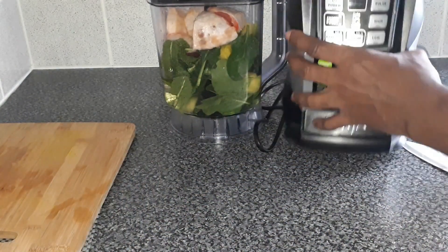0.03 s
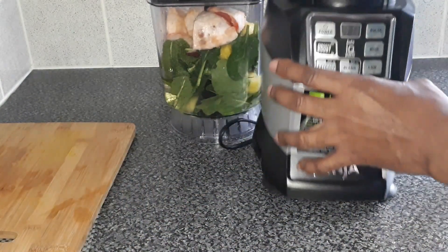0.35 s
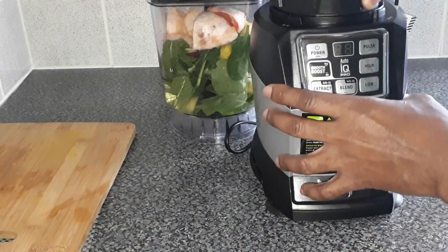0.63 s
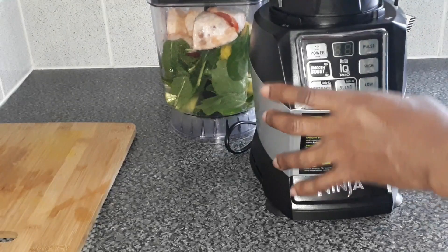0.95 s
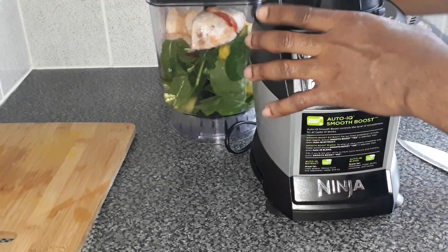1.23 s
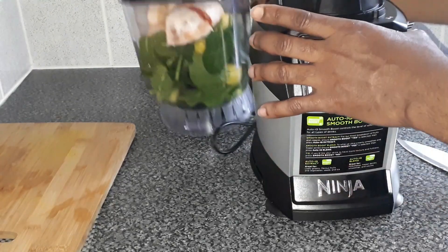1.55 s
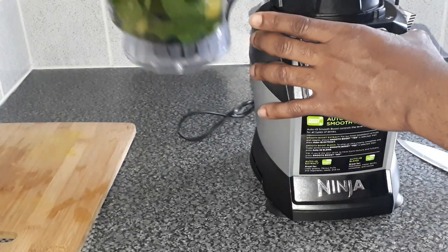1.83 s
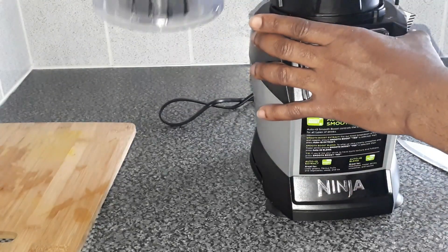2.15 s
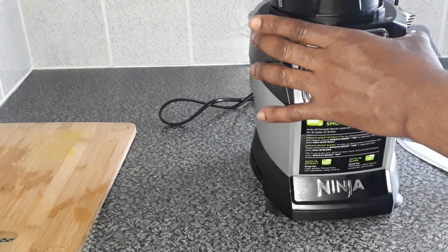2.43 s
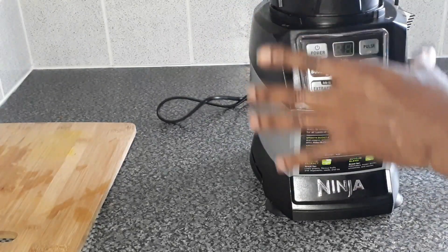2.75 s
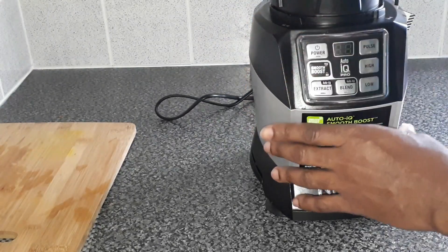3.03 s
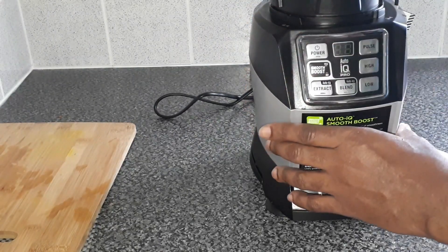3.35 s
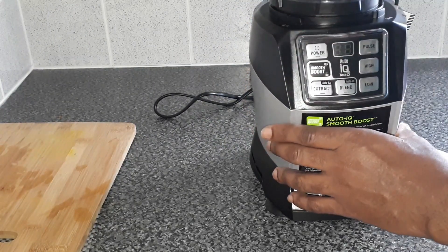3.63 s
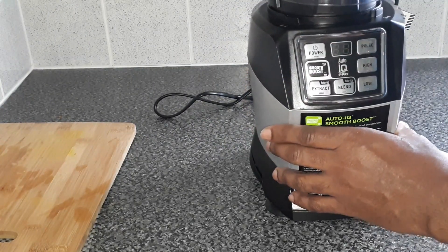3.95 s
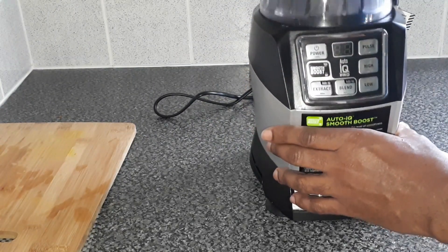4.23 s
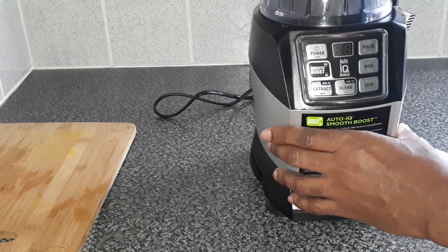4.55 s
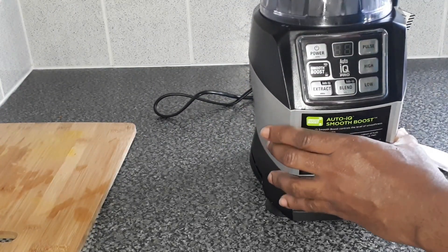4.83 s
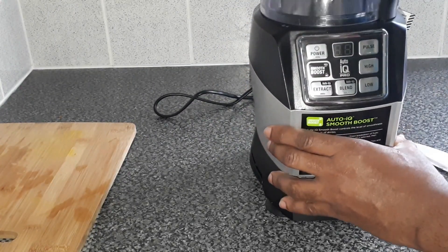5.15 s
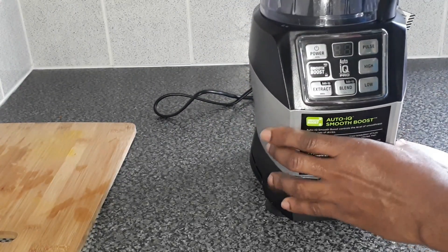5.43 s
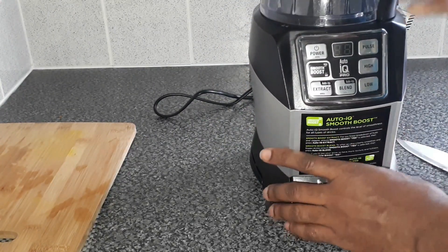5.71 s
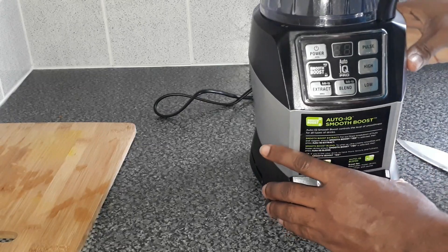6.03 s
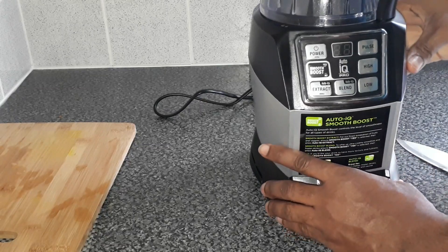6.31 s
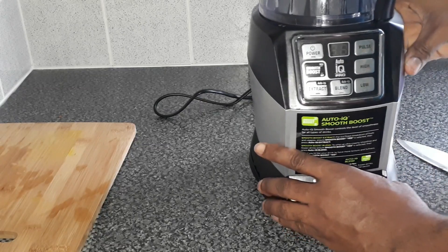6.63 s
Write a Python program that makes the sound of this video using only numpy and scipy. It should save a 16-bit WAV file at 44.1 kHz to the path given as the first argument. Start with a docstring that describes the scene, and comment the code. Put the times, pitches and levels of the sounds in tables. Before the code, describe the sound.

In a small tiled kitchen, heard from close by, a blender base is dragged over the counter on squeaky, juddering rubber feet. A full plastic jar is lifted with light knocks while a cord slides faintly. The jar bumps and rubs on the base, then drops into its seat with a loud, hollow clunk. Smaller clacks, a brief finger squeak and a scraping twist follow.

```python
"""A small tiled kitchen, a closely spaced microphone pair near the counter; the room answers each contact.
A blender's motor base is dragged along on rubber feet that stick and slip, and is set down.
The full plastic jar is gripped and lifted past the trailing cord. It rubs and knocks on the base, each
blow ringing the modes of both, then drops into its seat and rattles as it is twisted tight.
Last, a finger squeaks on the plastic and the jar scrapes round once more."""
import sys
import numpy as np
from scipy import signal
from scipy.fft import rfft, irfft, next_fast_len
from scipy.io import wavfile
from scipy.ndimage import uniform_filter1d

SR = 44100
rng = np.random.default_rng(int(sys.argv[2]) if len(sys.argv) > 2 else 0)


def to_wav(sig):
    """Store sig (one row per channel, or 1-D mono) as 16-bit WAV at the path in sys.argv[1].

    Samples outside -1..1 are clipped; the rate is SR.
    """
    pcm = np.clip(np.atleast_2d(sig), -1, 1) * 32767
    pcm = np.round(pcm).astype(np.int16)
    wavfile.write(sys.argv[1], SR, pcm.T)  # frames by channels


N = 294543
TOP_HZ = 15900
RING_TIME = np.arange(SR * 3 // 4) / SR

# grit under the rubber feet: (frequency [Hz], density [dB])
GRIT_COLOUR = [(150, -13), (400, -3.5), (1200, 6), (2700, -6.5), (4000, -11.5), (7000, -20.5), (9000, -39),
               (15000, -40.5)]


def amp(db):
    """Decibels to gain."""
    return 10 ** (np.asarray(db) / 20)


def rms(x):
    """Root mean square."""
    return np.sqrt(np.mean(x ** 2) + 1e-20)


def along(points, hz):
    """Read (frequency, value) points on a log frequency axis."""
    point_hz, values = np.transpose(points)
    return np.interp(np.log(hz + 1), np.log(point_hz), values)


def filtered(x, response):
    """Shape x by a gain that depends on frequency."""
    n = x.shape[-1]
    padded = next_fast_len(n + 8192)
    return irfft(rfft(x, padded) * response(np.fft.rfftfreq(padded, 1 / SR)), padded)[..., :n]


def add(track, s, sound):
    """Mix a sound into the track from time s."""
    start = max(round(s * SR), 0)
    track[:, start:start + sound.shape[-1]] += sound[..., :N - start]


def ring(modes, scatter_db):
    """Damped modes of alternating sign, struck at new strengths each time."""
    hz, db, t60 = np.transpose(modes)[:, :, None]
    strength = amp(db + scatter_db * rng.standard_normal(hz.shape)) * (-1) ** np.arange(len(hz))[:, None]
    return np.sum(strength * amp(-60 * RING_TIME / t60) * np.sin(2 * np.pi * hz * RING_TIME), axis=0)


def diffuse(size):
    """White noise at the microphone pair: alike in the bass, mostly unrelated in the treble."""
    # likeness of left and right: (frequency [Hz], correlation [ratio])
    correlation = [(120, 0.93), (250, 0.92), (500, 0.79), (1000, 0.29), (2000, 0.24), (4000, 0.57),
                   (10000, 0.18)]
    mid, side = rng.standard_normal((2, size))
    mid = filtered(mid, lambda hz: np.sqrt(1 + along(correlation, hz)))
    side = filtered(side, lambda hz: np.sqrt(1 - along(correlation, hz)))
    return np.array([mid + side, mid - side]) / np.sqrt(2)


def room_tail():
    """A fresh answer from the tiles; each frequency dies at its own speed."""
    # the kitchen's reverberation: (frequency [Hz], t60 [s])
    decay_times = [(60, .48), (200, .41), (600, .4), (1500, .39), (4000, .37), (8000, .35), (15000, .3)]
    hz, t, spectrum = signal.stft(diffuse(len(RING_TIME)), SR, nperseg=256)
    decay = amp(-60 * t / along(decay_times, hz)[:, None])
    return signal.istft(spectrum * decay, SR, nperseg=256)[1][:, :len(RING_TIME)]


def in_room(x, wet_db):
    """A mono source reaches the microphones directly and by way of the tiles."""
    tail = room_tail()
    tail /= np.linalg.norm(tail[0])
    return x + amp(wet_db) * signal.fftconvolve(x[None], tail, axes=1)[:, :N]


def room_tone(air_db, hiss_hz, hiss_db):
    """The still kitchen, with a thin hiss that slowly swells and sinks."""
    # still air: (frequency [Hz], density [dB])
    air_colour = [(15, -52), (25, -1.5), (179, -9.5), (222, -16), (392, -13.5), (604, -18.5), (812, -19),
                  (2200, -26), (3130, -29), (5520, -33), (6140, -33), (15800, -38.5)]
    air = filtered(diffuse(N), lambda hz: amp(along(air_colour, hz)))
    hiss = filtered(diffuse(N), lambda hz: np.exp(-((hz - hiss_hz) / 260) ** 2))
    drift = filtered(rng.standard_normal(N), lambda hz: np.exp(-(hz / 2) ** 2))
    swell_db = 1.6 * drift / rms(drift)
    return amp(air_db) * air / rms(air) + amp(hiss_db + swell_db) * hiss / rms(hiss)


def friction(strokes, colour, catches_per_s, casing_db, wet_db):
    """Tiny catches of uneven size excite the casing while one surface slides on another."""
    # casing resonances: (frequency [Hz], width [Hz], level [dB])
    resonances = [(249.2, 26, 14.5), (378, 16, 4), (439, 23, 5.5), (1256, 87, -28), (1400, 170, 2),
                  (2020, 430, -2), (2800, 130, -6)]
    casing = lambda hz: sum(amp(db + casing_db) * 1j * hz * width / (f0 ** 2 - hz ** 2 + 1j * hz * width)
                            for f0, width, db in resonances)
    catches = (rng.random(N) < catches_per_s / SR) * rng.standard_normal(N)
    grains = filtered(catches, lambda hz: amp(along(colour, hz)) * (1 + casing(hz)))
    t = np.arange(N) / SR
    # loudness follows the hand, which speeds up and slows down once a stroke
    arch = lambda u: np.maximum(4 * u * (1 - u), 0) ** 0.43
    effort = sum(amp(db) * arch((t - start) / length) for start, length, db in strokes)
    return in_room(grains / rms(grains) * effort, wet_db) / np.hypot(1, amp(wet_db))


def base_drag():
    """The rubber feet slide over grit on the counter."""
    # slides of the base: (start [s], length [s], level [dB])
    strokes = [(-0.02, 0.036, -29.5), (0.02, 0.033, -47.5), (0.165, 0.05, -39), (0.3, 0.078, -44.5)]
    return friction(strokes, GRIT_COLOUR, catches_per_s=1300, casing_db=-3.5, wet_db=3.5)


def slips(build_db=2, chatter_s=0.026, chatter_db=-14.5, fade_db=0.5):
    """Slips grow as a push builds and chatter away if it eases off: (time [s], level [dB])."""
    # pushes on the base: (first slip [s], hardest slip [s], stop [s], sticking time [s], level [dB])
    pushes = [(0.002, 0.054, 0.094, 0.084, -31), (0.114, 0.157, 0.35, .022, -25),
              (0.308, 0.341, 0.3, .033, -29.5)]
    rows = []
    for first, hardest, stop, stick_s, db in pushes:
        for k in range(round((hardest - first) / stick_s) + 1):
            rows.append((hardest - k * stick_s, db - k * build_db))
        for k in range(1, int((stop - hardest) / chatter_s) + 1):
            rows.append((hardest + (k + rng.uniform(0, .4)) * chatter_s, db + chatter_db - k * fade_db))
    return rows


def feet_judder(grit_db, grit_t60, rebound_db, wet_db):
    """The rubber feet stick and let go in short chirps, each with a weaker rebound."""
    # modes of a foot: (frequency [Hz], level [dB], t60 [s])
    foot_modes = [(1019, -4, 0.081), (1116, -1, 0.028), (1300, -9, 0.018), (1870, -13.5, 0.0094),
                  (2253, -11.5, 0.035), (2510, -16.5, 0.031)]
    out = np.zeros((1, N))
    for s, db in slips():
        stretch = np.exp(.05 * rng.standard_normal())  # the load on the foot shifts its pitch
        chirp = ring([(hz * stretch, mode_db, t60) for hz, mode_db, t60 in foot_modes], scatter_db=1)
        grit = amp(grit_db - 60 * RING_TIME / grit_t60) * rng.standard_normal(len(RING_TIME))
        grit = filtered(grit, lambda hz: amp(along(GRIT_COLOUR, hz)))
        add(out, s, amp(db) * (chirp + grit))
        add(out, s + .0075, amp(db + rebound_db) * chirp)
    return in_room(out[0], wet_db)


def registers(x):
    """Split into thud, hollow, knock, clack, snap and edge, each at rms 1 over its first 40 ms."""
    # borders between the registers: (frequency [Hz])
    crossovers = [170, 330, 750, 1900, 4200]
    edges = [48, *crossovers, TOP_HZ]
    bands = [signal.sosfilt(signal.butter(3, pair, 'band', fs=SR, output='sos'), x)
             for pair in zip(edges, edges[1:])]
    return np.array([band / rms(band[:, :SR // 25]) for band in bands])


def knocks(crack_db, crack_t60, shell_db, boom_db, boom_t60, swell_s):
    """Contacts crack and ring the shell; weight brings out the bass and the boom, hardness the treble."""
    # plastic contacts: (time [s], rise [s], level [dB], weight [dB], hardness [dB], boom near [Hz])
    contacts = [(0.003, .003, -44.5, -18, 1.5, 400), (0.491, 0.00047, -37.5, -26.5, 12, 240),
                (0.58, 0.0052, -67, 16, -10, 66), (1.137, 0.0031, -38.5, -5, 0, 400),
                (1.157, 0.0048, -40.5, -12, -7, 400), (1.265, 0.0069, -55, 4, 6, 240),
                (1.311, .0015, -49, -3, 8.5, 240), (1.444, .002, -46.5, -10, 2, 400),
                (1.594, 0.0042, -52, -15.5, 5.5, 400), (2.031, 0.0027, -53.5, -10, -2.5, 400),
                (2.153, .0015, -57, -9, -19, 310), (2.738, 0.0017, -30.5, 5.5, -3, 129),
                (2.752, 0.003, -26.5, -3.5, -11, 129), (2.864, 0.0043, -38, 3.5, -5.5, 240),
                (2.942, 0.0011, -42, -41, -7, 240), (3.031, .001, -49.5, 7, -18, 66),
                (3.108, 0.0095, -52, 6.5, -14, 240), (3.188, 0.005, -30.5, -8, -3, 240),
                (3.202, 0.0024, -36, 10.5, 5, 240), (3.422, .0015, -53.5, -2, -2, 400),
                (3.52, .003, -57, -1.5, -2, 390), (3.646, 0.0054, -47, -0.5, -3.5, 240),
                (3.676, 0.0065, -48, -1, 2.5, 240), (3.695, 0.0017, -47, -14, 3, 240),
                (3.808, 0.0062, -55.5, 6, 2, 240), (3.949, 0.0009, -58, -18, 4, 400),
                (4.11, 0.0068, -46.5, -3.5, 2, 129), (4.146, .0025, -34, 0.5, 0, 240),
                (4.19, 0.0011, -37, -3.5, 5, 240), (4.252, 0.0056, -28.5, -0.5, -3, 240),
                (4.2645, .0008, -14.5, -7.5, -2, 240), (4.287, 0.0052, -22, 6, 0, 240),
                (4.353, 0.0031, -33.5, -23, -2, 240), (4.405, 0.0043, -36, -0.5, -8.5, 240),
                (4.671, 0.0032, -54, -17, -3, 240), (5.018, 0.0063, -45.5, -1.5, 7.5, 310),
                (5.044, 0.0014, -33, 4.5, 6, 310), (5.071, 0.0027, -45.5, 10, -13, 310),
                (5.134, .0015, -40.5, -16, -2, 310), (5.174, 0.00062, -32.5, 0, 2, 240),
                (5.391, 0.0025, -56.5, -8, 2.5, 400), (5.912, .005, -62.5, -4, -4.5, 240),
                (6.006, 0.00053, -38.5, -10.5, -1, 240), (6.465, 0.0057, -48, 0, 2, 400),
                (6.612, 0.0059, -37.5, -13, 0.5, 240)]
    # jar and base ringing together: (frequency [Hz], level [dB], t60 [s])
    shell_modes = [(69.4, -4, 0.36), (139.4, 2.5, 0.074), (171.8, -6.5, 0.52), (238.85, 3.5, 0.4),
                   (292.5, -11, 0.29), (306.2, -2.5, 0.32), (397, 2, 0.24), (477.6, -4, 0.44),
                   (536, -2.5, 0.27), (581.5, -4.5, .36), (698.5, -3.5, 0.39), (779, -5.5, 0.38),
                   (908, -9, 0.39), (975, 3.5, 0.27), (1042, -0.5, 0.15), (1190, -4, .35),
                   (1368, -1.5, 0.21), (1554, 9, 0.038), (1670, -8.5, 0.098), (1866, -14.5, 0.28),
                   (2150, -17, 0.25), (2170, -19.5, 0.33), (2690, -6, 0.35), (3097, -8.5, 0.35),
                   (3650, -22, 0.068)]
    # clatter of plastic: (frequency [Hz], density [dB])
    clatter_colour = [(30, -33), (55, -8), (130, 1), (250, 5), (500, 0), (640, -0.5), (900, 5), (1500, 1.5),
                      (2600, 0.5), (3600, -6), (5000, -12.5), (6800, -11), (8600, -21), (12000, -20),
                      (16000, -28.5)]
    # thud to edge: (level [dB], weight share [ratio], hardness share [ratio], change for jar alone [dB])
    register_mix = [(-3.5, 1.0, -0.12, -9), (1, 0.93, 0, 0), (-0.5, 0.0081, -0.07, 2.5),
                    (-1.67, -0.13, 0.22, -0.5), (-4.5, 0.041, 0.88, -1), (-14, 0.03, 1.34, 0)]
    out, t = np.zeros((2, N)), RING_TIME
    for s, rise_s, level_db, weight_db, hard_db, boom_hz in list(contacts) + jar_rattles():
        jar_alone = boom_hz > 280  # the higher modes belong to the jar
        bands_db = level_db + np.dot(register_mix, [1, weight_db, hard_db, jar_alone])
        # the softer the contact (edge against snap), the duller its top
        shelf_db = 0.46 * min(bands_db[-1] - bands_db[-2] + 6, 0)
        colour = lambda hz: amp(along(clatter_colour, hz) + shelf_db * hz ** 4 / (hz ** 4 + 8000 ** 4))
        crack = amp(crack_db - 60 * t / crack_t60) * diffuse(len(t))
        clatter = filtered(crack + room_tail(), colour)
        shell = amp(shell_db) * ring(shell_modes, scatter_db=-2)
        onset = 1 - np.exp(-(t / rise_s) ** 2)  # slow for a glancing contact, sudden for a square one
        bands = registers(onset * (clatter + shell))
        add(out, s - rise_s / 2, np.tensordot(amp(bands_db), bands, 1))
        mode_hz = min((hz for hz, _, _ in shell_modes), key=lambda hz: abs(hz - boom_hz))
        mode_db = level_db + boom_db + 0.6 * weight_db
        swell = 1 - np.exp(-t / swell_s)  # the heavy body takes a few cycles to get moving
        add(out, s, amp(mode_db - 60 * t / boom_t60) * swell * np.sin(2 * np.pi * mode_hz * t))
    return out


def hand_grip():
    """The hand rubs the jar as it shifts its grip, heard mostly off the tiles."""
    # shifts of the hand: (start [s], length [s], level [dB])
    strokes = [(1.25, 0.18, -46.5), (4.98, .04, -50), (5.9, .11, -49)]
    # skin on plastic: (frequency [Hz], density [dB])
    colour = [(47, -47), (80, -30), (127, -5), (197, -39), (246, -13.5), (350, -32), (382, -15), (757, -11),
              (1200, -23.5), (2600, -24.5), (15500, -44.5)]
    return friction(strokes, colour, catches_per_s=630, casing_db=0.5, wet_db=17.5)


def cord_trail():
    """The power cord trails over the counter."""
    # slides of the cord: (start [s], length [s], level [dB])
    strokes = [(1.46, 0.33, -53), (1.72, 0.27, -48), (1.98, 0.13, -54)]
    # cord on counter: (frequency [Hz], density [dB])
    colour = [(59, -52), (100, -15.5), (205, -25), (238, -7.5), (340, -11.5), (460, 3), (633, -4),
              (922, -7), (1850, -18), (3020, -41), (9000, -47), (11700, -84), (19800, -120)]
    return friction(strokes, colour, catches_per_s=670, casing_db=-8.5, wet_db=4.5)


def rim_rub():
    """The jar rubs on the rim of the base in sparse catches."""
    # rubs: (start [s], length [s], level [dB])
    strokes = [(2.95, 0.4, -49), (3.2, .15, -55), (3.42, 0.43, -57), (3.8, 0.51, -55)]
    # jar on rim: (frequency [Hz], density [dB])
    colour = [(24, -46), (40, -17.5), (117, -8.5), (245, -9.5), (304, -12.5), (527, -10), (829, -17.5),
              (1160, -2), (1500, -18.5), (1870, -14.5), (2870, -22), (3550, -35.5), (7450, -50.5),
              (8590, -57.5), (12000, -66.5), (15600, -73), (22000, -120)]
    return friction(strokes, colour, catches_per_s=130, casing_db=0.5, wet_db=0)


def jar_rattles(gap_s=0.098, rise_s=0.0025, scatter_db=3.5, weight_db=-9, hard_db=3, boom_hz=400):
    """The jar shifts loosely in the hand or its seat: light, unevenly timed contacts for knocks()."""
    # spells of rattling: (start [s], end [s], level [dB])
    spells = [(3.862, 4.051, -58.5), (4.737, 4.799, -67), (5.41, 5.601, -65)]
    rows = []
    for start, end, db in spells:
        count = max(round((end - start) / gap_s), 1)
        for k in range(count):
            s = start + (end - start) * (k + rng.uniform(.2, .8)) / count
            level_db = db - scatter_db * rng.standard_normal()
            rows.append((s, rise_s, level_db, weight_db, hard_db, boom_hz))
    return rows


def finger_squeak(start_s, hold_s, level_db, fade_db_per_s, pitch_hz, sag_hz_per_s):
    """A fingertip creeps, slips and comes to rest on the plastic: a wavering tone over a soft flutter."""
    # flutter of the fingertip: (frequency [Hz], density [dB])
    flutter_colour = [(40, -31.5), (130, -10), (250, -4.5), (420, -6), (620, -4), (800, -24), (1500, -47.5),
                      (5000, -79.5)]
    t = np.arange(N) / SR - start_s
    creep = ((t > -0.019) & (t < 0)) * amp(-15)
    slip = (t >= 0) * amp(-fade_db_per_s * np.maximum(t - hold_s, 0))
    envelope = amp(level_db) * uniform_filter1d(creep + slip, size=160)
    phase = 2 * np.pi * np.cumsum(pitch_hz - sag_hz_per_s * t) / SR
    waver = filtered(rng.standard_normal(N), lambda hz: np.exp(-(hz / 70) ** 2))
    tone = np.sqrt(2) * amp(2 * waver / rms(waver)) * np.sin(phase)
    flutter = filtered(rng.standard_normal(N), lambda hz: amp(along(flutter_colour, hz)))
    return in_room(envelope * (tone + amp(-3) * flutter / rms(flutter)), wet_db=-10.5)


def seat_scrape():
    """The jar scrapes round in its seat in dense catches."""
    # twists: (start [s], length [s], level [dB])
    strokes = [(6.38, 0.081, -47.5), (6.458, .095, -33.5), (6.582, 0.055, -28), (6.63, 0.11, -32)]
    # jar in seat: (frequency [Hz], density [dB])
    colour = [(29, -71), (50, -43), (196, -7), (232, -4.5), (310, -19), (385, -10.5), (891, -11),
              (1370, -3.5), (1660, -13), (6690, -33.5), (15500, -57.5)]
    return friction(strokes, colour, catches_per_s=1500, casing_db=-4, wet_db=2)


def scene():
    """All the handling over the room tone, a little louder at the left microphone."""
    blows = knocks(crack_db=5.5, crack_t60=0.034, shell_db=-16.5, boom_db=18, boom_t60=0.2, swell_s=0.017)
    feet = feet_judder(grit_db=-2.5, grit_t60=0.0522, rebound_db=-14, wet_db=0)
    sliding = base_drag() + hand_grip() + cord_trail() + rim_rub() + seat_scrape()
    finger = finger_squeak(start_s=6.21, hold_s=0.039, level_db=-36, fade_db_per_s=226,
                           pitch_hz=557, sag_hz_per_s=300)
    still = room_tone(air_db=-66.5, hiss_hz=3083, hiss_db=-76)
    return (blows + feet + sliding + finger + still) * amp([[.7], [-.7]])


def record(dry):
    """The recorder thins the deepest bass, rounds the highest peaks and keeps nothing above TOP_HZ."""
    thinned = signal.sosfilt(signal.butter(2, 32, 'high', fs=SR, output='sos'), dry)
    rounded = thinned / (1 + np.abs(thinned / .97) ** 8) ** (1 / 8)
    return filtered(rounded, lambda hz: hz < TOP_HZ)


dry = scene()
out = record(dry)
to_wav(out)
```